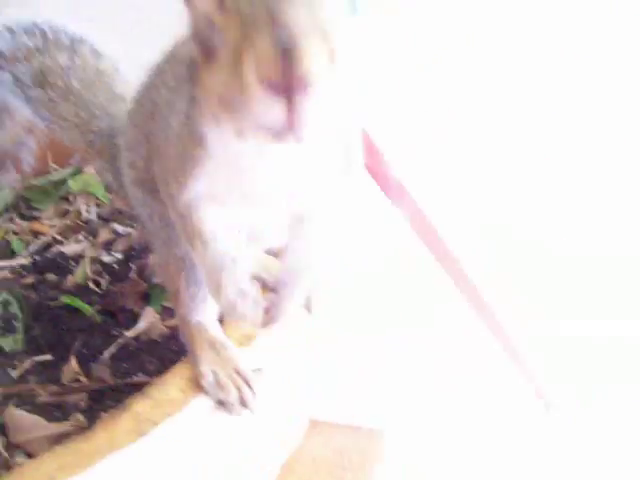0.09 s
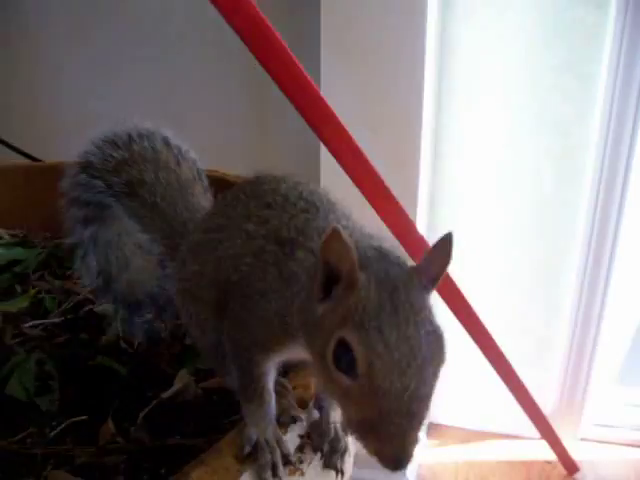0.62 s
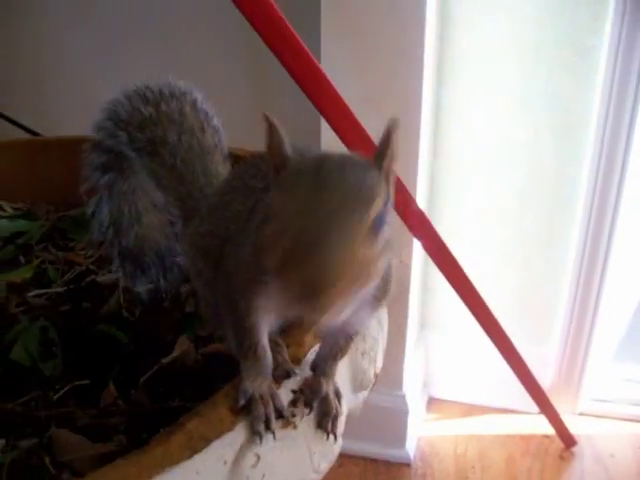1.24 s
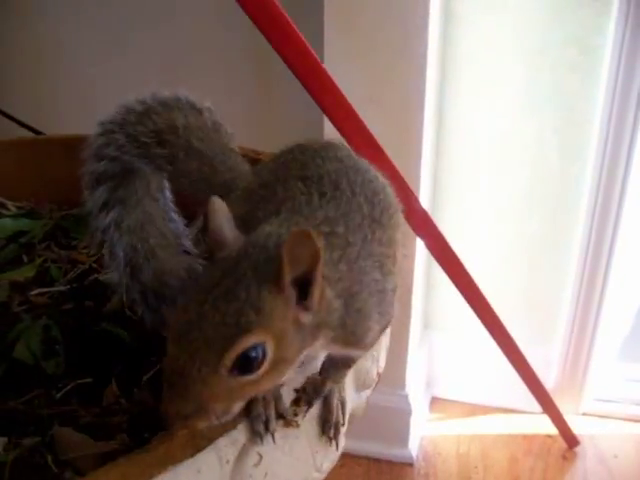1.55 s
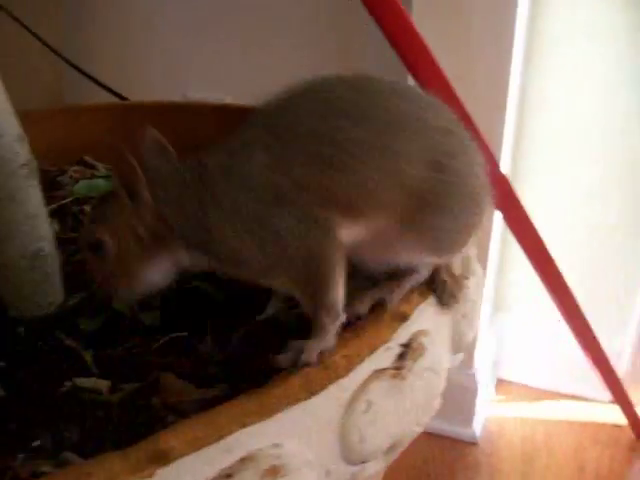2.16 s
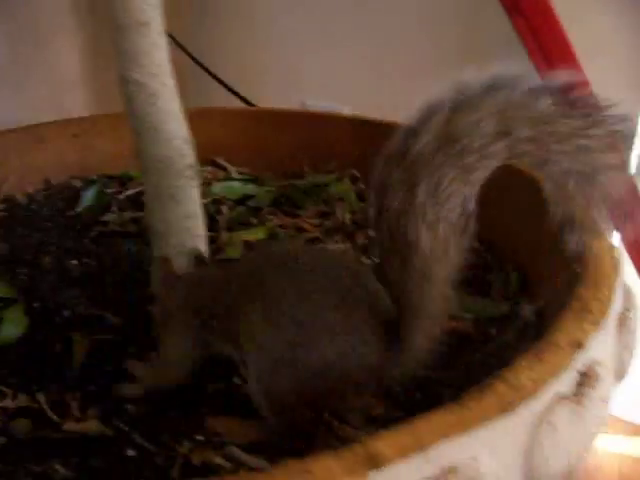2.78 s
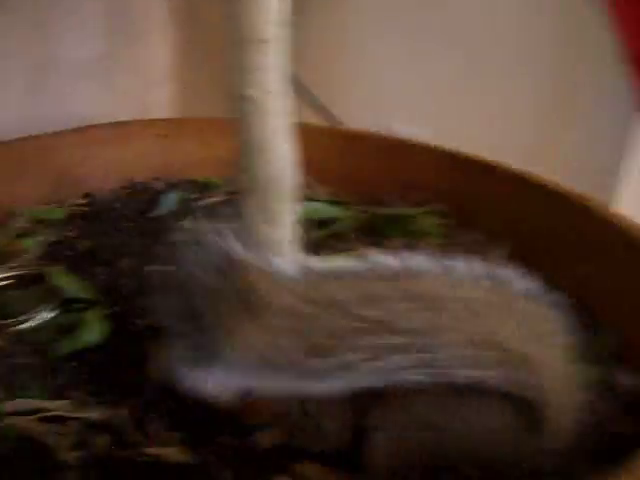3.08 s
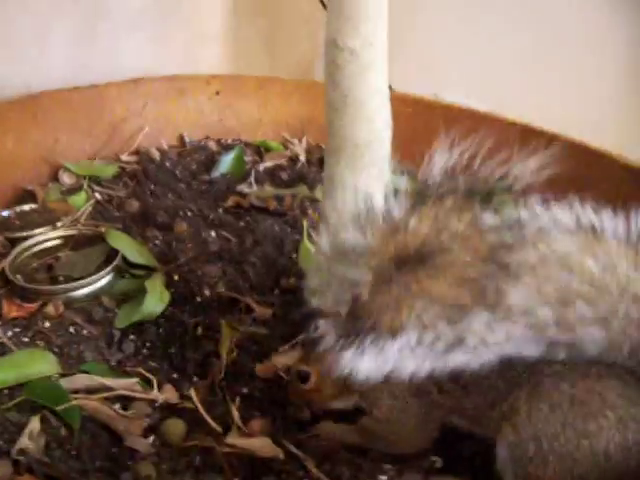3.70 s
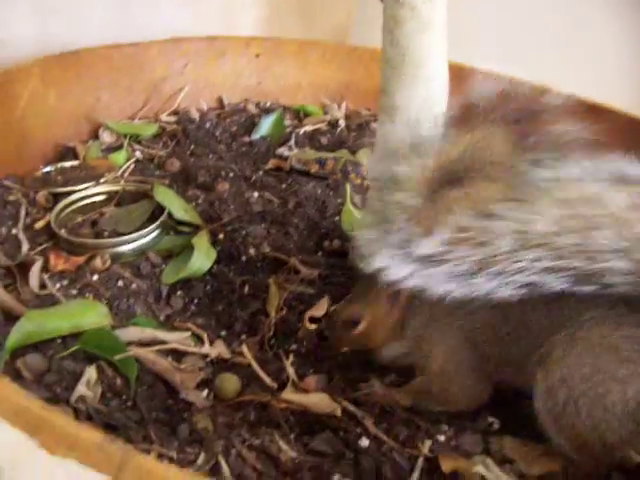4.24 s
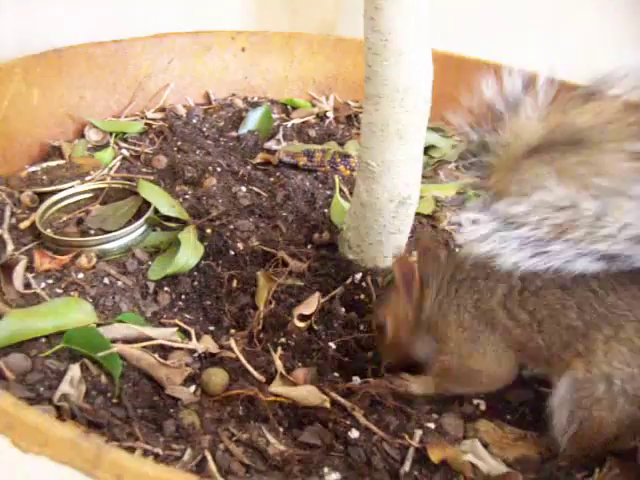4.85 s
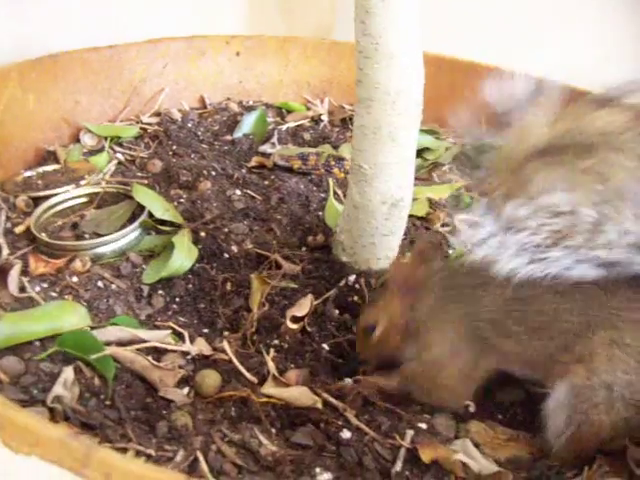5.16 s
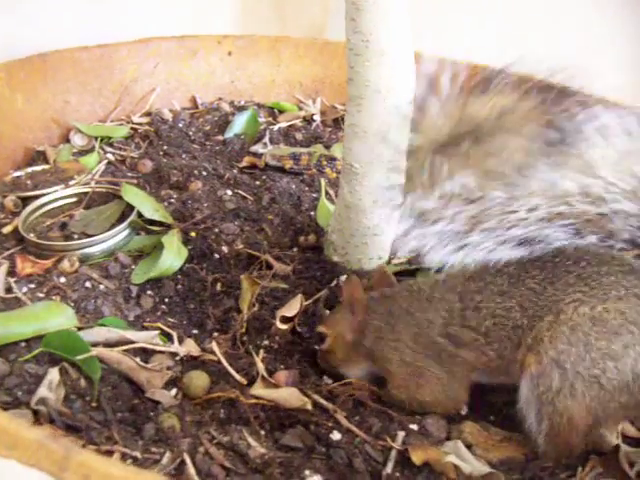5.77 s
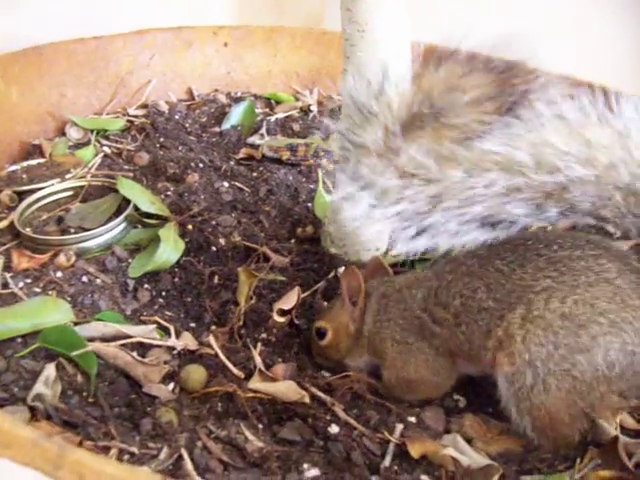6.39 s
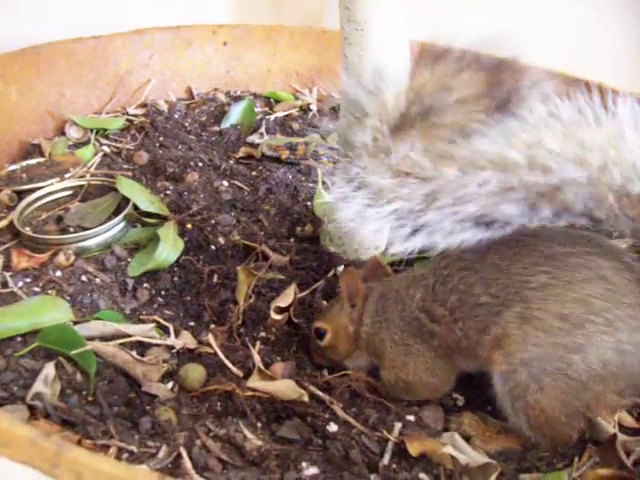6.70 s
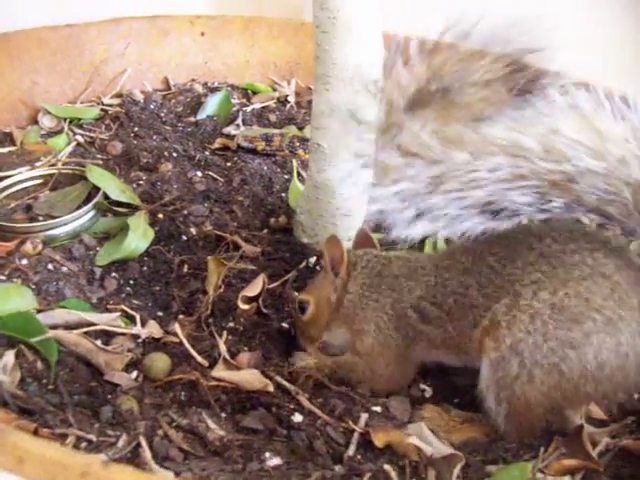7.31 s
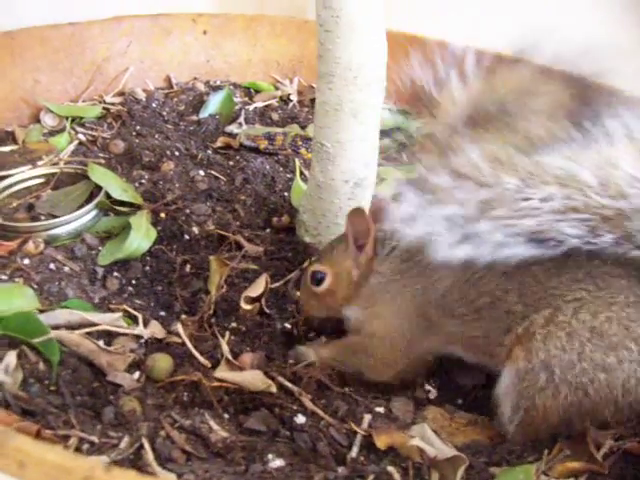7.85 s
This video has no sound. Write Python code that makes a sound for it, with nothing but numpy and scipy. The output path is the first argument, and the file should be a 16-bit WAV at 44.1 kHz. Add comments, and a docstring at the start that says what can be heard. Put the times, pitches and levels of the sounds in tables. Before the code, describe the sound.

A squirrel scratches through dry leaves and soil with crisp little snaps, while distant birds chirp over a steady rush of air.

```python
"""Squirrel in an indoor plant pot

Close to the microphone, a squirrel rummages in the dry leaves and soil of a large pot by a door:
leaves snap, crumbs crack, a twig rings and the pot thumps under its hops. Farther off, outside,
three songbirds whistle and buzz over a steady rush of air and a low appliance hum.
The small hand-held camera clicks twice, whines faintly and ticks once a second."""
import sys
import numpy as np
from scipy import signal
from scipy.fft import rfft, irfft
from scipy.io import wavfile
from scipy.ndimage import map_coordinates

SR = 44100
rng = np.random.default_rng(int(sys.argv[2]) if len(sys.argv) > 2 else 0)


def materialize(psi):
    """Save the field psi as 16-bit PCM at rate SR to the path in sys.argv[1].

    A 1-D psi becomes a single channel; in a 2-D psi each row is a channel.
    """
    bounded = np.clip(np.atleast_2d(psi).T, -1, 1)
    quanta = np.round(bounded * 32767).astype(np.int16)
    wavfile.write(sys.argv[1], SR, quanta)


N = 354123
T = np.arange(N) / SR

# bright spectrum of a dry leaf cracking: (frequency [Hz], level [dB])
LEAF_SPECTRUM = [(300, -23), (1000, -22), (2500, -11.5), (3500, -8), (5000, -4), (6500, 1), (8000, -5)]


def amp(db):
    """Decibels to gain."""
    return 10 ** (np.asarray(db) / 20)


def unit(x):
    """Scales to rms 1."""
    return x / np.sqrt(np.mean(x ** 2) + 1e-20)


def add(mix, s, sound):
    """Mixes a sound in at s seconds."""
    part = mix[max(0, round(s * SR)):][:len(sound)]
    part += sound[:len(part)]


def colour(x, points, tilt_db=0):
    """Filters by (Hz, dB) points, tilted by tilt_db an octave between 1.5 and 8 kHz."""
    hz = np.fft.rfftfreq(len(x), 1 / SR) + 1
    point_hz, point_db = np.transpose(points)
    curve = np.interp(np.log(hz), np.log(point_hz), point_db)
    tilt = tilt_db * np.log2(np.clip(hz, 1500, 8000) / 5000)
    return irfft(rfft(x) * amp(curve + tilt), len(x))


def drift(size, rate):
    """A smooth random wander, rms about 1, that changes rate times a second."""
    knots = rng.standard_normal(4096)
    return map_coordinates(knots, [np.arange(size) * rate / SR], mode="wrap")


def sine(hz):
    """A tone that follows a pitch curve."""
    return np.sin(2 * np.pi * np.cumsum(hz) / SR)


def mode(t, hz, db, t60):
    """One resonance, dying by 60 dB in t60 seconds."""
    return amp(db - 60 * t / t60) * np.sin(2 * np.pi * hz * t)


def echoes(x, t60, gap):
    """A tail of scattered reflections that starts after gap seconds."""
    t = np.arange(SR // 2) / SR
    reflections = rng.standard_normal(len(t)) * (rng.random(len(t)) < .1)
    tail = reflections * amp(-60 * t / t60) * (t > gap)
    return signal.oaconvolve(x, tail / np.linalg.norm(tail))[:N]


def room_air(hiss_db=-53.5, waver=0.00308, throb=0.27):
    """Room tone: rushing air, thin hiss and the wavering hum of a running appliance."""
    # spectra of the low rush and of the hiss: (frequency [Hz], level [dB])
    air_spectrum = [(12, -46.5), (20, -22.5), (27, -7.5), (49, -7.5), (97, -4.5), (129, -8), (192, -3.5),
                    (261, -7), (300, -4), (394, -6.5), (460, -6), (574, -7.5), (637, -9.5), (882, -6),
                    (1200, -17.5), (1560, -39), (2640, -120)]
    hiss_spectrum = [(710, -36.5), (1200, -10.5), (1330, -1.5), (1580, -2.5), (2210, -4), (2550, -3.5),
                     (3250, -7), (3700, -4.5), (5440, -6), (6140, -4.5), (6720, -13), (7300, 1),
                     (9490, -24), (16100, -120)]
    # slow rise and fall of the rush: (time [s], level [dB])
    air_levels = [(0.7, -44.5), (1.08, -45.5), (4.93, -44.5), (7.9, -47)]
    # the appliance's tones: (frequency [Hz], level [dB])
    hum_tones = [(59.2, -55.5), (194, -60), (295, -63), (514, -64.5), (1122, -75.5), (1418, -76)]
    air_db = np.interp(T, *np.transpose(air_levels)) - 0.17
    air = unit(colour(rng.standard_normal(N), air_spectrum)) * amp(air_db)
    hiss = unit(colour(rng.standard_normal(N), hiss_spectrum)) * amp(hiss_db + 1.27 * drift(N, 12))
    hum = np.zeros(N)
    for hz, db in hum_tones:
        swell = 1 + throb * drift(N, 5.1)
        hum += amp(db) * np.sqrt(2) * swell * sine(hz * (1 + waver * drift(N, 9)))
    return air + hiss + hum


def camera_whine(frame_hz=30, whine_hz=7867, blip_hz=7582, blip_s=0.0011, first_tick_s=0.548):
    """The camera's electronics leak in: a whine, blips, a tick each second and a thin whistle."""
    polarity = np.tanh(20 * np.sin(np.pi * frame_hz * T))  # flips each frame
    whine = np.sin(2 * np.pi * whine_hz * T) * polarity
    half_frame = 1 / (2 * frame_hz)
    from_blip = (T + half_frame / 2) % half_frame - half_frame / 2
    blips = np.sin(2 * np.pi * blip_hz * T) * np.exp(-(from_blip / blip_s) ** 2)
    since_tick = (T - first_tick_s) % 1
    tick = unit(colour(rng.standard_normal(N), LEAF_SPECTRUM, tilt_db=-3)) * np.exp(-since_tick / .004)
    thin = sine(6290 + 50 * drift(N, 20) + 45 * drift(N, 200))  # the pitch wanders and jitters
    return amp(-51) * whine + amp(-48) * blips + amp(-38) * tick + amp(-63) * thin


def crumb_sizes(count, spread_db):
    """Uneven gains: many small crumbs, a few large."""
    return amp(spread_db * np.minimum(rng.exponential(1, count), 3))


def soil(crumbs_per_s=110, decay_s=0.0025, gain_db=-2):
    """Small crumbs of soil crack and fall under the paws, duller than the leaves."""
    # how hard the paws work the soil: (time [s], level [dB])
    digging = [(0, -50.5), (1.0, -56), (1.6, -60), (2.2, -59), (2.65, -59), (2.95, -51), (3.2, -51),
               (3.5, -57), (4.2, -57), (4.6, -54), (5.0, -55), (6.4, -60), (8, -74)]
    # spectrum of a crumb cracking: (frequency [Hz], level [dB])
    crumb_spectrum = [(400, -21), (900, -5), (1500, -7.5), (2400, 0), (3500, -7), (6500, -3.5), (8000, -13)]
    impacts = crumb_sizes(N, spread_db=3) * (rng.random(N) < crumbs_per_s / SR)
    envelope = signal.lfilter([1], [1, -np.exp(-1 / (decay_s * SR))], impacts + 1e-12)
    crackle = unit(colour(envelope * rng.standard_normal(N), crumb_spectrum))
    return crackle * amp(np.interp(T, *np.transpose(digging)) + gain_db)


def whistle(length, pitches, depth_hz, trill_per_s, flutter=0.38):
    """A bird's note of rms 1 arching through three pitches; a slow trill warbles, a fast one buzzes."""
    progress = np.linspace(0, 1, int(length * SR))
    size = len(progress)
    arch = np.polyval(np.polyfit([0, .5, 1], pitches, 2), progress)
    roughness = min(trill_per_s / 130, 1) ** 2
    trill = np.sin(2 * np.pi * (trill_per_s * length * progress + rng.random()))
    trill += .6 * roughness * drift(size, 3 * trill_per_s)
    tone = sine(arch + depth_hz * trill) * (1 + flutter * roughness * drift(size, 350))
    return unit(tone * signal.windows.tukey(size, .3))


def bird_songs():
    """The first bird repeats the same five syllables, louder or softer."""
    # each delivery of the song: (time [s], level [dB])
    songs = [(0.069, -41.5), (0.434, -42), (0.801, -43), (4.951, -47.5), (5.311, -47.5)]
    # a slur, a hook, a rise, a buzz and a soft low end: (delay [s], length [s], start pitch [Hz],
    # middle pitch [Hz], end pitch [Hz], level [dB], trill depth [Hz], trill rate [1/s])
    syllables = [(-.03, .034, 4870, 4270, 3450, -9.5, 250, 160), (0, 0.028, 2470, 2824, 2250, 0, 30, 42),
                 (.078, 0.057, 3010, 3160, 3380, -5.5, 50, 150),
                 (0.118, 0.043, 3480, 3740, 3780, -1.5, 237, 140),
                 (0.181, 0.039, 2450, 2290, 2220, -12, 30, 75)]
    out = np.zeros(N)
    for s, db in songs:
        for delay, length, *pitches, syllable_db, depth_hz, trill_per_s in syllables:
            add(out, s + delay, amp(db + syllable_db) * whistle(length, pitches, depth_hz, trill_per_s))
    return out


def leaf_snaps(build_s=0.00085, snap_s=0.00063, decay_s=0.0056, snap_db=4, gain_db=-25):
    """A leaf vein or a claw strains, lets go with a snap and crackles for a few milliseconds."""
    # leaf snaps and claw ticks: (time [s], level [dB], brightness [dB/octave])
    snaps = [(0.093, -22, -1), (0.551, -16, -3), (0.6, -12, -3.5), (0.86, -22, -4), (1.183, -27.5, -7),
             (1.243, -20, 3), (1.884, -20.5, 7), (2.248, -13.5, 7), (2.303, -23, 1), (2.363, -12.5, 11),
             (2.471, -20.5, -6.5), (2.779, -24, 6), (2.934, -15.5, 10), (3.083, -31, -16),
             (3.137, -27, -14), (3.176, -18.5, 15), (3.3202, -11, -0.5), (3.329, -10.5, -2.5),
             (3.3653, -18, 8), (4.535, -28.5, -4), (4.705, -26, -1), (4.787, -30, 0), (5.931, -23.5, -3)]
    out, t = np.zeros(N), np.arange(-1024, 1024) / SR
    crackle = np.exp(-abs(t) / np.where(t < 0, build_s, decay_s))
    release = amp(snap_db) * np.exp(-abs(t) / snap_s) * (t >= 0)
    for s, db, tilt_db in snaps:
        crack = rng.standard_normal(len(t)) * (crackle + release)
        add(out, s + t[0], amp(db + gain_db) * unit(colour(crack, LEAF_SPECTRUM, tilt_db)))
    return out


def bird_buzzes():
    """The second bird gives thin, rising buzzes, alone or in quick runs."""
    # its high calls: (time [s], length [s], pitch [Hz], level [dB])
    calls = [(0.1, 0.034, 7210, -45), (0.532, .05, 7050, -42.5), (0.617, .055, 7370, -41),
             (0.836, 0.055, 7250, -43.5), (1.273, 0.067, 7350, -43), (1.358, .056, 7430, -41.5),
             (1.454, .048, 7380, -40), (1.558, 0.053, 7270, -40.5), (1.688, .064, 7520, -42.5),
             (2.019, 0.084, 7620, -45), (2.097, 0.059, 7430, -41.5), (2.178, 0.056, 7500, -42),
             (2.271, 0.065, 7400, -41), (3.411, .031, 7830, -47), (3.722, 0.37, 7680, -55.5),
             (4.327, .05, 7400, -52), (5.141, .05, 7460, -51.5), (5.301, 0.054, 7420, -51.5),
             (6.618, .18, 7750, -55), (7.126, 0.0374, 6700, -40.5)]
    out = np.zeros(N)
    for s, length, hz, db in calls:
        rise = [.945 * hz, hz, 1.025 * hz]
        add(out, s, amp(db) * whistle(length, rise, depth_hz=453, trill_per_s=122))
    return out


def case_clicks(crack_db=-15, crack_s=0.0024):
    """Handling noise: the plastic case snaps under a finger, right beside the microphone."""
    # modes of the case, pressed at two spots:
    # (frequency [Hz], t60 [s], level at the first spot [dB], level at the second [dB])
    case_modes = [(690, 0.046, -19.5, -25.5), (810, 0.022, -15, -48), (1024, 0.046, -30, -28),
                  (1220, 0.017, -34, -21), (1480, 0.022, -22, -19), (1890, 0.025, -25, -22),
                  (2185, 0.016, -19, -17), (2400, 0.013, -19, -22.5), (2790, 0.015, -20.5, -22),
                  (3070, 0.0075, -17.5, -40), (4020, 0.0034, -10.5, -14), (5000, 0.0073, -14.5, -14.5),
                  (6650, 0.0089, -20.5, -22), (7050, 0.0039, -17.5, -8.5), (7640, 0.0066, -13, -39)]
    # one press at each spot: (time [s], level [dB])
    presses = [(0.3396, 1), (0.4804, 2.5)]
    out, t = np.zeros(N), np.arange(4096) / SR
    for spot, (s, db) in enumerate(presses):
        ring = sum(mode(t, hz, levels[spot], t60) for hz, t60, *levels in case_modes)
        crack = amp(crack_db) * rng.standard_normal(len(t)) * np.exp(-t / crack_s)
        add(out, s, amp(db) * (ring + crack))
    low_cut = signal.butter(5, 520, "high", fs=SR, output="sos")  # so small a case radiates no bass
    return signal.sosfilt(low_cut, out)


def paw_strokes(grains_per_s=2200):
    """Each stroke of a paw breaks a swarm of crumbs and leaf edges of uneven size."""
    # sweeps through the leaves: (time [s], length [s], level [dB], brightness [dB/octave])
    strokes = [(0.366, 0.019, -47, -5), (0.394, 0.047, -47.5, -5), (0.517, 0.047, -43.5, -3),
               (1.691, 0.035, -40, 2), (1.843, 0.011, -45.5, -8.5), (1.882, 0.012, -43, -1),
               (2.162, 0.05, -42.5, -1), (2.338, 0.04, -39.5, 0), (2.386, 0.077, -47.5, 5),
               (2.479, 0.038, -37, 0.5), (2.778, 0.028, -41, 1), (2.887, 0.02, -43, 6),
               (2.93, 0.082, -43, 8), (3.077, 0.02, -34.5, 17), (3.305, 0.044, -34.5, 3.5),
               (3.311, 0.021, -27, 19), (4.324, 0.16, -52, 2), (4.512, 0.046, -53, -10),
               (4.78, .022, -41, 1)]
    out, t = np.zeros(N), np.arange(8192) / SR
    for s, length, db, tilt_db in strokes:
        sizes = crumb_sizes(len(t), spread_db=16) * rng.choice([-1, 1], len(t))
        grains = sizes * (0.36 + (rng.random(len(t)) < grains_per_s / SR))  # some stand out of the bed
        pressure = np.sin(np.pi * np.minimum(t / length, 1)).clip(0) ** 0.19
        rustle = unit(colour(grains * pressure, LEAF_SPECTRUM, tilt_db))
        add(out, s, amp(db) * np.sqrt(length / t[-1]) * rustle)
    return out


def pot_thumps():
    """The soil-filled pot answers a hop with a few damped low modes."""
    # the body's weight landing: (time [s], level [dB], hardness [dB/octave])
    landings = [(1.699, -47, 9), (1.8445, -40, 10.5), (5.933, -33.5, 1.5), (6.49, -40, -2)]
    # modes of the pot: (frequency [Hz], level [dB], t60 [s])
    pot_modes = [(191, 1.5, 0.15), (343, -6.5, 0.056), (504, -7.5, 0.072), (696, -13.5, 0.067)]
    out, t = np.zeros(N), np.arange(SR // 4) / SR
    for s, db, hardness in landings:
        for hz, mode_db, t60 in pot_modes:
            octaves_up = np.log2(hz / pot_modes[0][0])
            add(out, s, mode(t, hz, db + mode_db + hardness * octaves_up, t60))
    return out


def bird_chirps(warbles_per_s=46, under_ratio=.885, under_db=-8.5):
    """The third bird sings a warbling arch in two voices, one a little lower and softer."""
    # its chirps: (time [s], length [s], middle pitch [Hz], end pitch [Hz], level [dB], warble depth [Hz])
    chirps = [(4.657, 0.025, 2660, 2560, -50, 30), (4.698, 0.025, 2724, 2520, -49, 30),
              (5.073, 0.04, 4940, 4520, -52, 19), (5.564, 0.034, 4390, 3900, -52, 170),
              (5.985, 0.045, 4520, 4700, -54.5, 150), (6.5, 0.05, 4740, 4460, -48, 170),
              (6.675, 0.044, 4480, 3570, -47, 42), (7.355, 0.06, 4550, 4850, -49.5, 190),
              (7.803, 0.061, 4500, 4250, -50.5, 160)]
    out = np.zeros(N)
    for s, length, hz, end_hz, db, depth_hz in chirps:
        arch = np.array([0.93 * hz, hz, end_hz])
        add(out, s, amp(db) * whistle(length, arch, depth_hz, warbles_per_s))
        add(out, s, amp(db + under_db) * whistle(length, under_ratio * arch, depth_hz, warbles_per_s))
    return out


def twig_taps():
    """Claws knock a dry twig, which rings briefly in its bending modes."""
    # claw knocks: (time [s], level [dB])
    knocks = [(5.922, -47), (5.932, -34.5), (6.481, -43)]
    # modes of the twig: (frequency [Hz], level [dB], t60 [s])
    twig_modes = [(2130, -13, .02), (2660, 1.5, 0.024), (3820, 2, 0.017), (5650, 1, 0.021),
                  (6240, -13, 0.013)]
    out, t = np.zeros(N), np.arange(4096) / SR
    ring = sum(mode(t, hz, db, t60) for hz, db, t60 in twig_modes)
    for s, db in knocks:
        add(out, s, amp(db) * ring)
    return out


def scene(room_db=-11, wall_delay_s=.017):
    """One microphone: the squirrel close, with a little room; the birds far, off a wall and the garden."""
    squirrel = leaf_snaps() + paw_strokes() + soil() + twig_taps() + pot_thumps()
    room = amp(room_db) * echoes(squirrel, t60=0.3, gap=.003)
    birds = bird_songs() + bird_buzzes() + bird_chirps()
    wall = np.pad(birds, (round(wall_delay_s * SR), 0))[:N]
    garden = echoes(birds, t60=.5, gap=.006)
    outside = amp(-2.5) * birds + amp(-11) * wall + amp(-5) * garden
    return (squirrel + room + outside + case_clicks() + room_air() + camera_whine())[None]


def low_pass(x, hz, taps=255, window=("kaiser", 8)):
    """A steep treble cut with no delay."""
    return signal.oaconvolve(x, signal.firwin(taps, hz, window=window, fs=SR), "same")


def record(dry, camera_sr=16000, ceiling=0.72):
    """The camera's low sampling rate mirrors the top of the treble; the two clicks just overload it."""
    band = low_pass(dry[0], camera_sr / 2 + 100, taps=151, window="hamming")
    mirrored = band * (1 + 2 * np.cos(2 * np.pi * camera_sr * T))
    rolled_off = colour(mirrored, [(7600, 0), (8150, -3.5), (8500, -15), (8900, -35.5)])
    clipped = np.clip(low_pass(rolled_off, hz=9200), -ceiling, ceiling)
    return low_pass(clipped, hz=16500)[None]


dry = scene()
out = record(dry)
materialize(out)
```